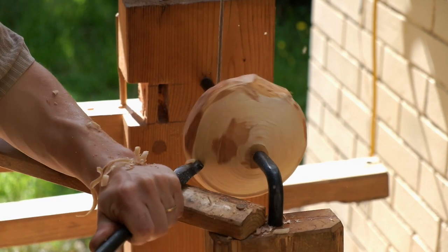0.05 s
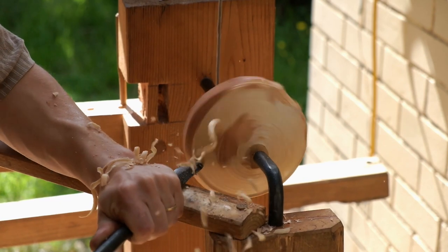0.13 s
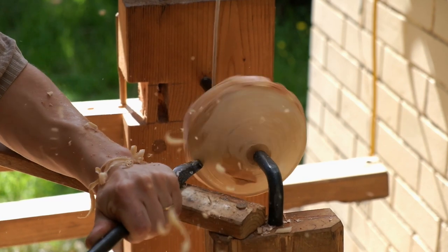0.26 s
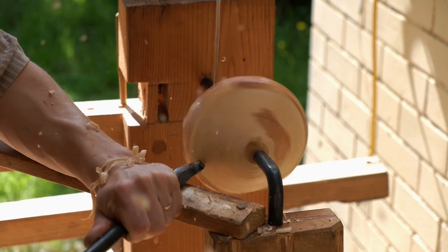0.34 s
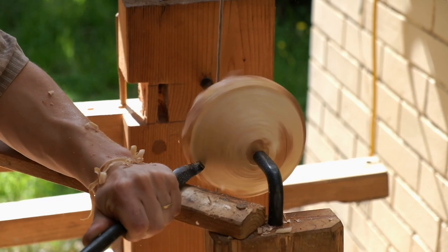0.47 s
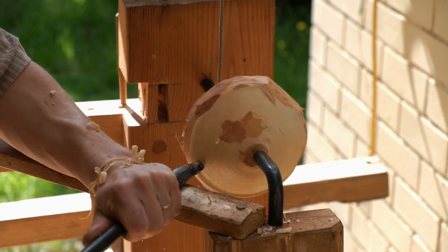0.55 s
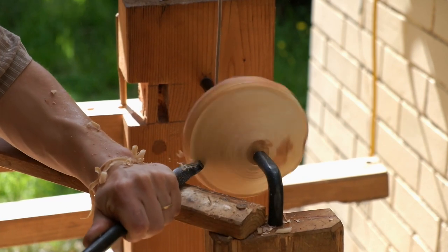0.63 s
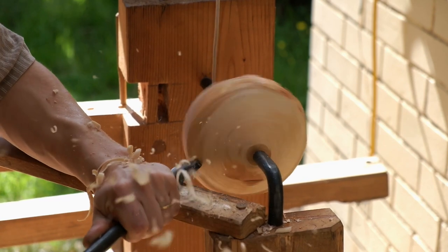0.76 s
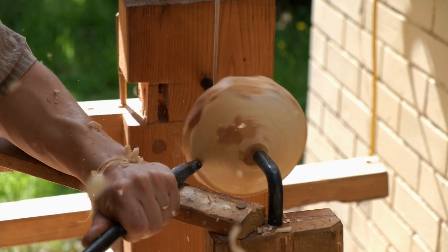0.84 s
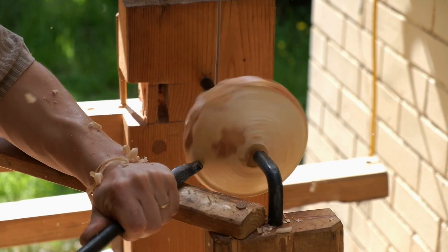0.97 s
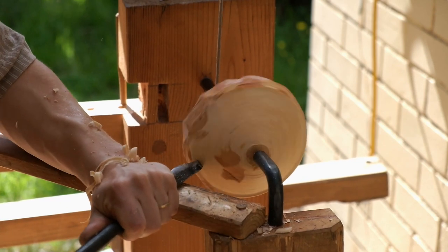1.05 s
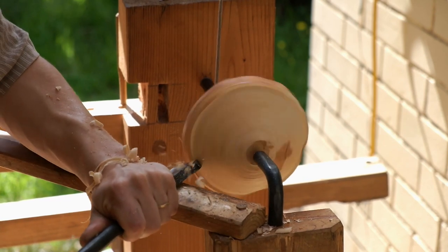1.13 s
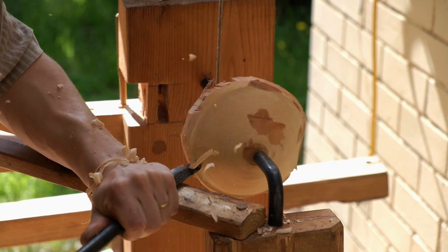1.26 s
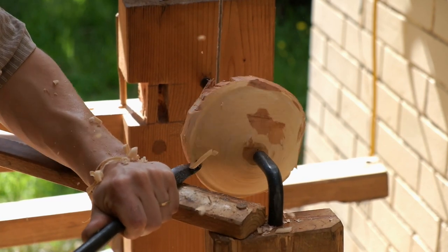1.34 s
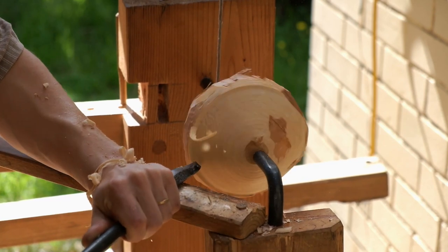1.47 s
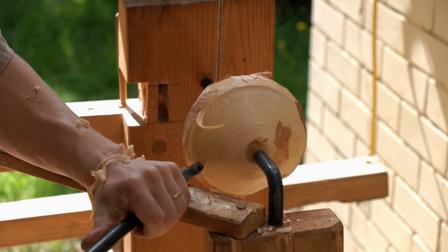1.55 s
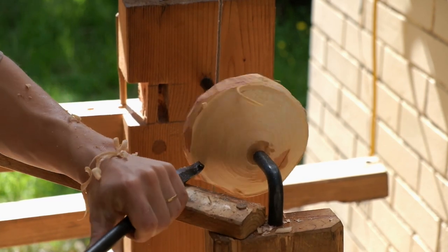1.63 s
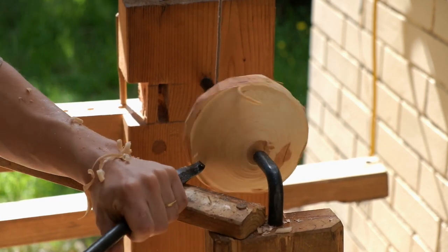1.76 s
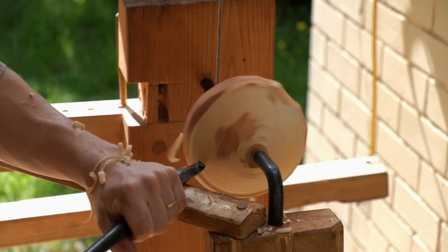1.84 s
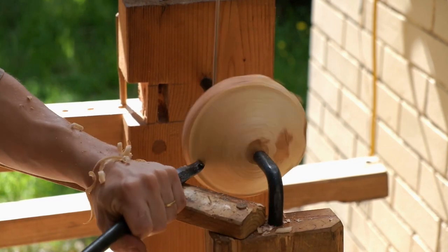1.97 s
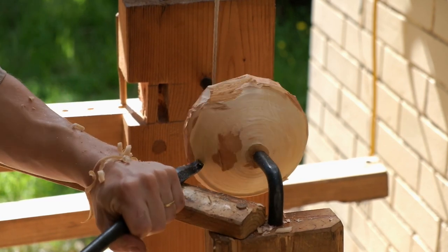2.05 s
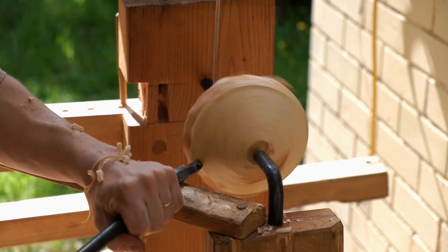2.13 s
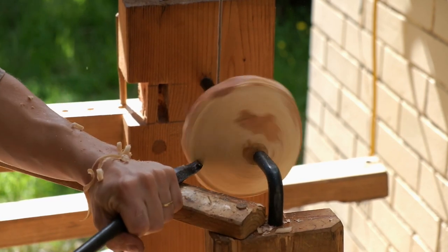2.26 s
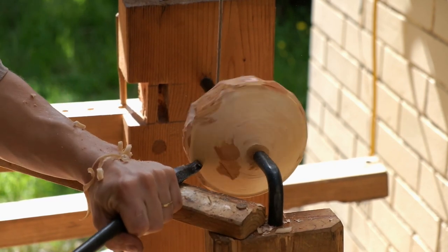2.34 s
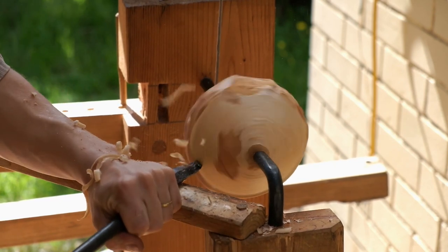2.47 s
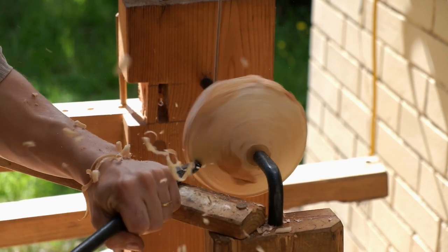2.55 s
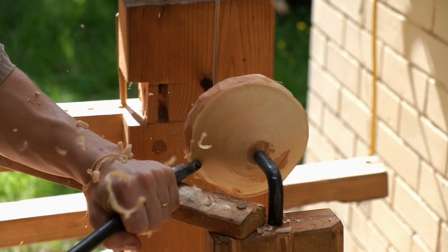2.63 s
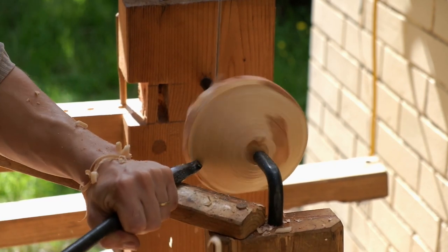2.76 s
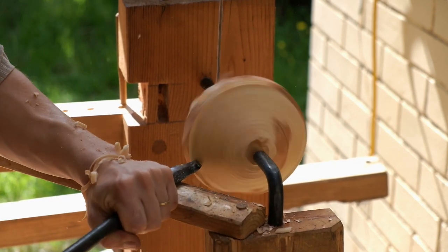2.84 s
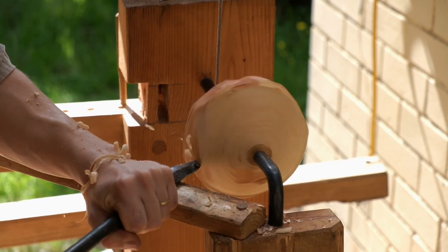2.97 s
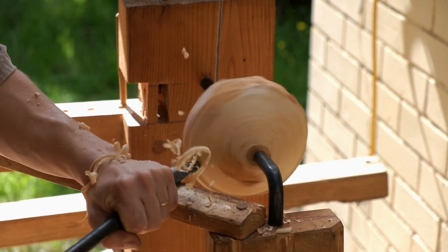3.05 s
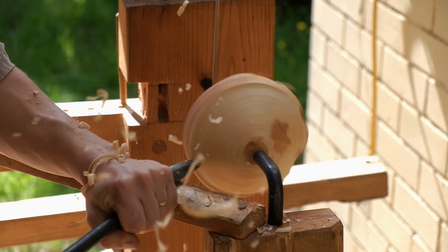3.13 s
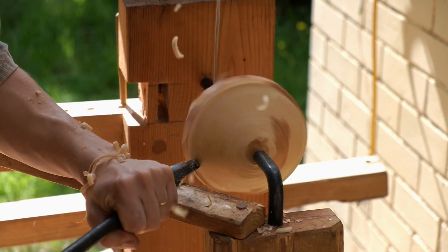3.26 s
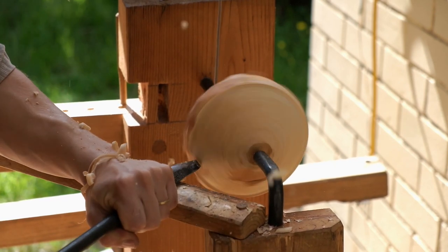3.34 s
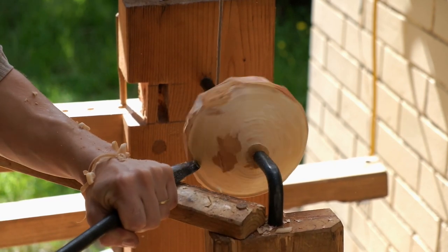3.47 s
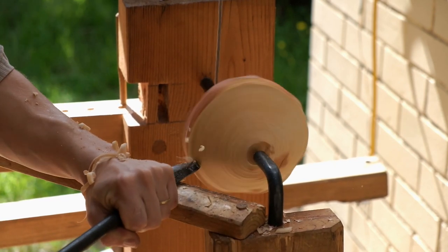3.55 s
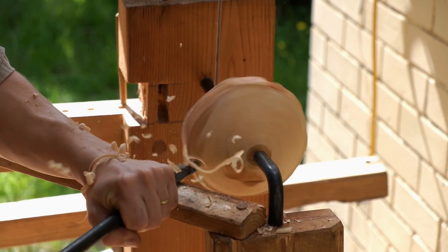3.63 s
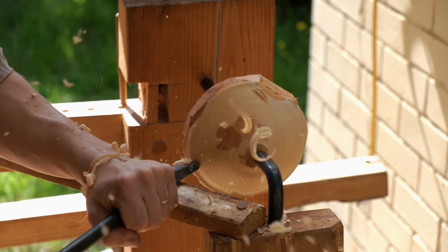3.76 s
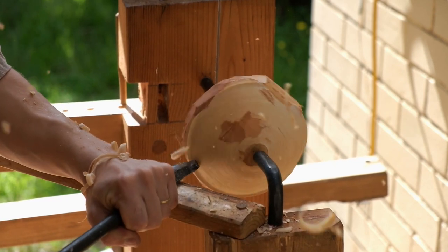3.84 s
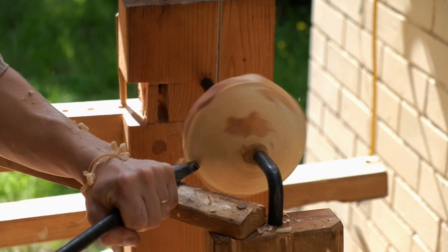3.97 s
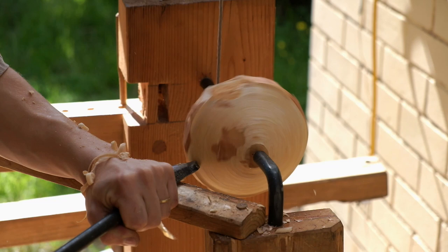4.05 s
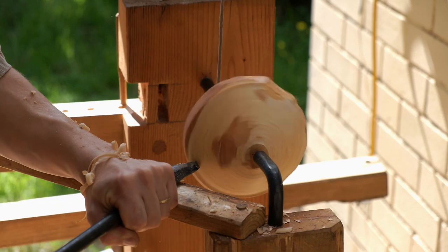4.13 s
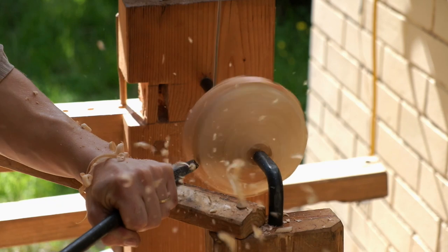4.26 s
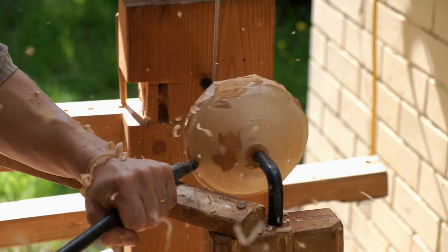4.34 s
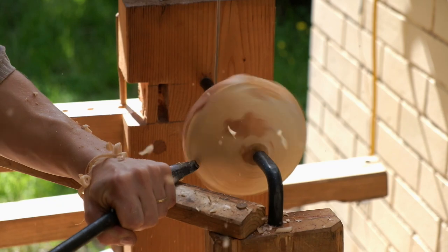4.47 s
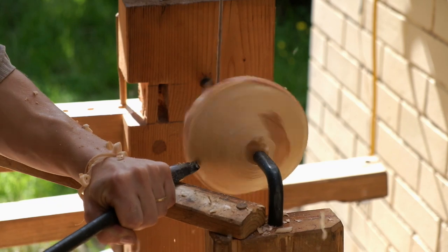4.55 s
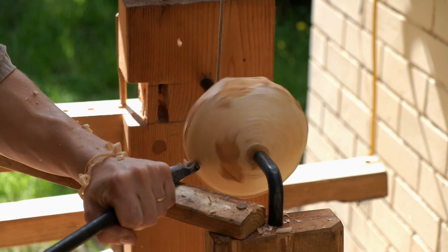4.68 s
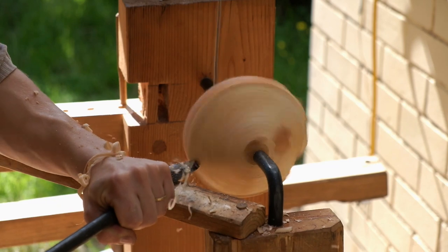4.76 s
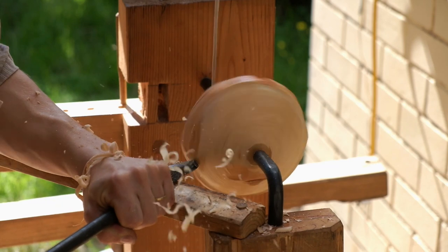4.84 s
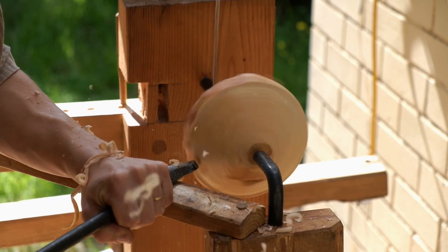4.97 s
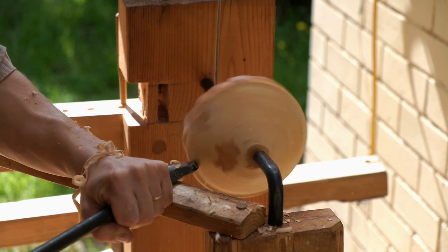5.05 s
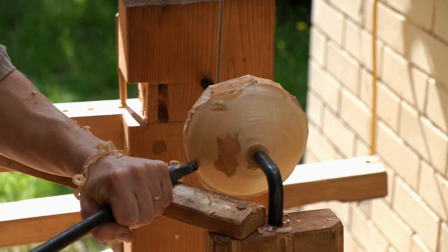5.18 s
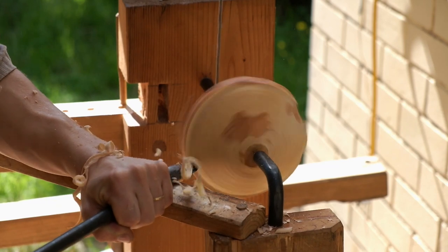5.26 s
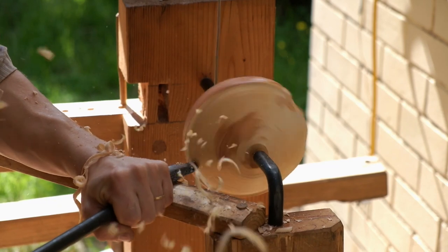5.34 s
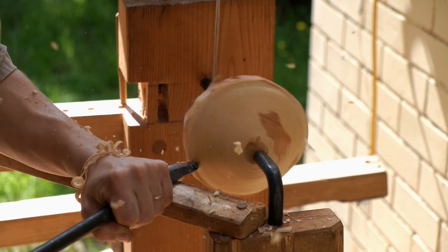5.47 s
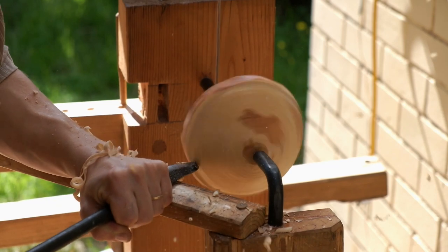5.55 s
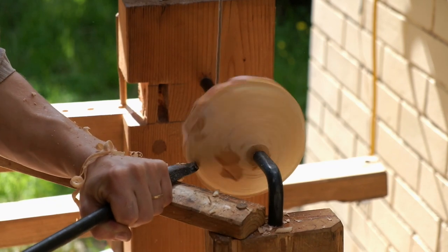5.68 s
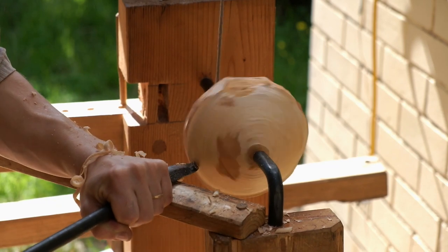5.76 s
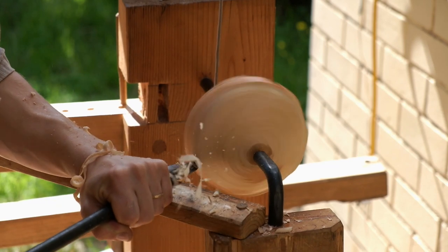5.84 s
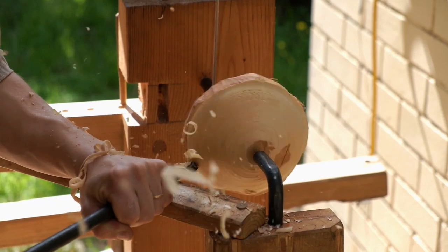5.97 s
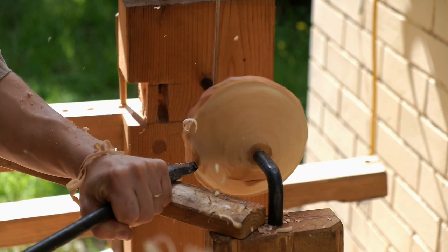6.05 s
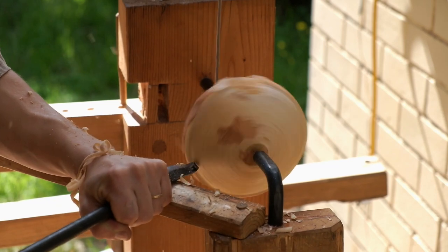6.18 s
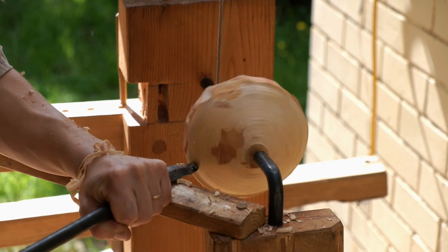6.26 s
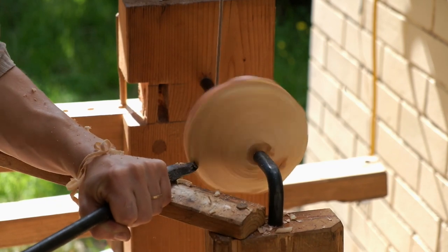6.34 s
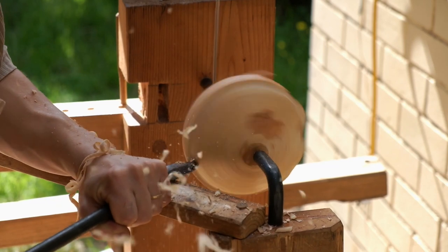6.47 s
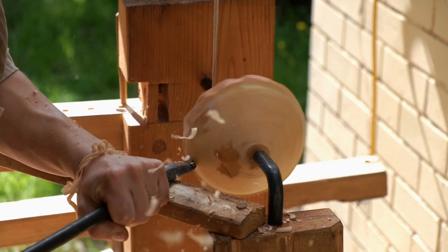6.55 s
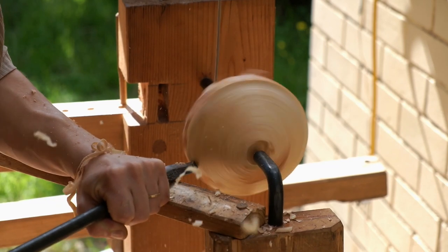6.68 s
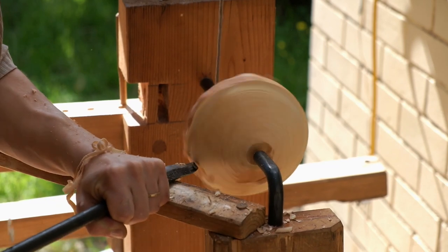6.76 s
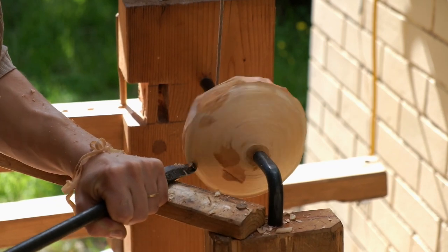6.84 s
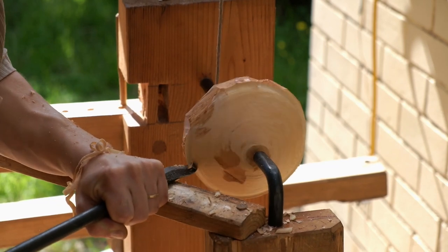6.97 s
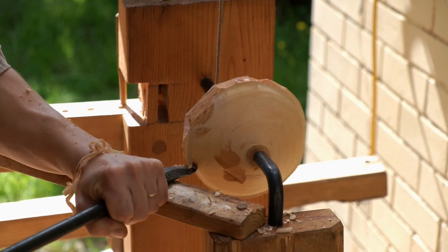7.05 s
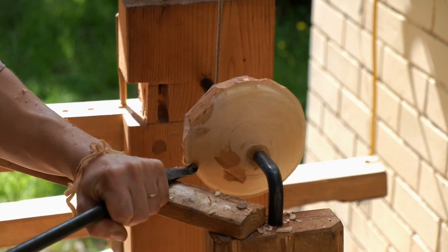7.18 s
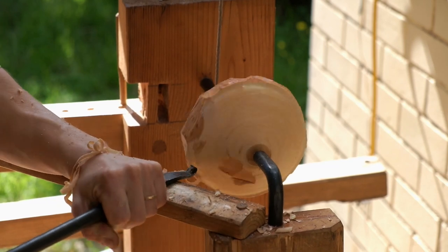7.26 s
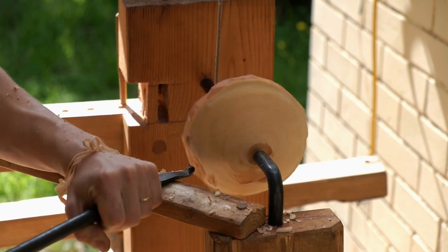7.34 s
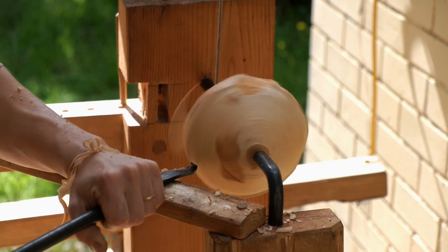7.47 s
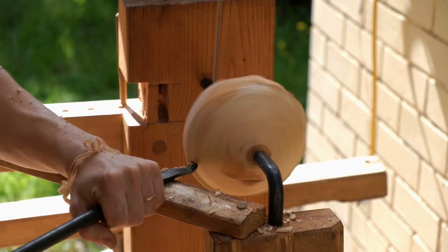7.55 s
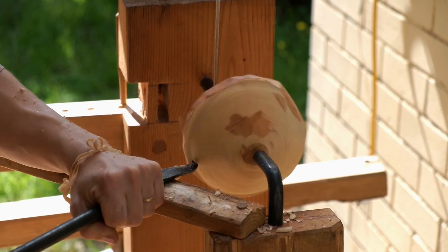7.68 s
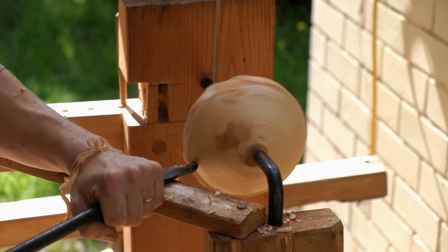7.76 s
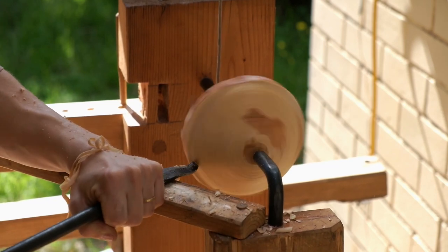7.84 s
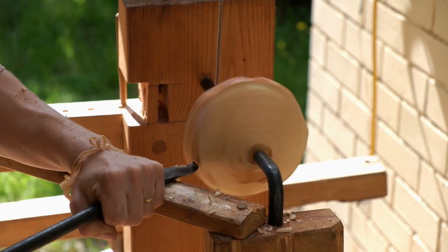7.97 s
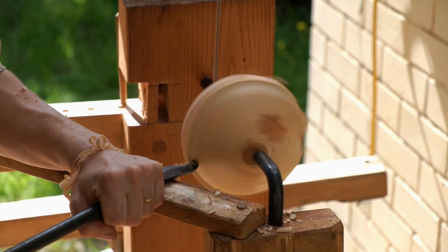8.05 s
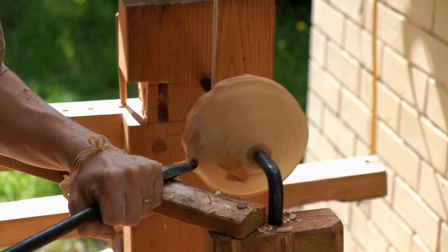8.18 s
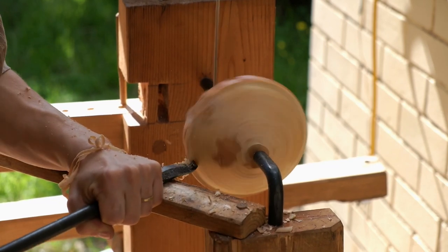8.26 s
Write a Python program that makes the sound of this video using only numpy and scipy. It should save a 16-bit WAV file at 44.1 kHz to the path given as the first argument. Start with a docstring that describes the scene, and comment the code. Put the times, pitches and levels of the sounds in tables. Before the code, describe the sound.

A close outdoor take of wood turned on a foot-driven lathe, over a faint low hum of air and distant traffic. A violent tearing bite of steel into wood lands at about 0.15 s, bright, gritty and ringing, with a hollow bowl tone. A very brief thin squeak comes near 0.56 s, rougher scrapes around 0.8 and a sharp one at 1.2 s. From 1.3 to 2.4 s there are mostly light skips, small knocks and ticks. Strong crunching cuts return near 2.5, 3.05, 3.65, 4.3, 4.8, 5.3 and 5.95 s, each with hissing shavings, then stuttering, softer contact on the backspin. A weaker cut at 6.45 s trails into dry chip ticks. From about 7 s it is nearly quiet, with only faint knocks, until light scraping and a dull wooden knock near 8.1 to 8.3 s. A nearby wall gives a short echo.

```python
"""A hard, tearing bite of steel into wood comes at once, over a low hum of distant traffic and air.
A bowl is turned on a foot-driven pole lathe in a yard, beside a brick wall that gives a quick echo.
On each down stroke, bursts of snapping fibres ring the hook tool and the bowl, and the shaving hisses.
As the pole spins the bowl back the edge only skips over it. Dull knocks of the frame, dry ticks of loose
chips and one brief squeak come between; a fast limiter holds the peaks."""
import sys
import numpy as np
from scipy import signal
from scipy.fft import rfft, irfft, next_fast_len
from scipy.io import wavfile
from scipy.ndimage import uniform_filter1d, minimum_filter1d

SR = 44100
rng = np.random.default_rng(int(sys.argv[2]) if len(sys.argv) > 2 else 0)


def bounce(signal):
    """Save signal as a 16-bit WAV file at the path given by the first command-line argument."""
    frames = np.transpose(np.atleast_2d(signal))
    limited = np.clip(frames, -1, 1)
    pcm = np.round(limited * 32767).astype(np.int16)
    wavfile.write(sys.argv[1], SR, pcm)


N = 366471
TIME = np.arange(N) / SR

# Pushes of the treadle, each with its spin back; levels are relative forces: deepest_cut_s [s], swell_s [s],
# fade_s [s], edge_db [dB], bowl_db [dB], back_edge_db [dB], back_bowl_db [dB], extra_hiss_db [dB]
STROKES = [(0.171, 0.064, 0.13, -16.5, -18.5, -56, -42, -1.5), (0.79, 0.13, 0.12, -22, -21, -49, -39.5, 5),
           (1.201, 0.066, .1, -30, -37, -72, -57, -4), (2.03, 0.059, 0.27, -38, -35.5, -44, -44, -2),
           (2.569, 0.078, 0.11, -20, -19, -51.5, -46.5, -6),
           (3.091, 0.046, 0.13, -21.5, -18, -53, -41.5, -1.5),
           (3.672, 0.13, 0.055, -20.5, -25.5, -53, -49, -2),
           (4.318, 0.12, .09, -19.5, -18, -55.5, -46.5, 3),
           (4.802, 0.049, 0.25, -27, -28, -45.5, -40.5, 2.5),
           (5.369, 0.096, 0.09, -18, -25.5, -51.5, -51, 5),
           (5.94, 0.08, 0.054, -10.5, -22.5, -53, -61, 5.5), (6.45, 0.078, 0.28, -24, -25, -68, -48.5, 2),
           (8.128, 0.026, 0.17, -28.5, -29.5, -46, -32, 6)]
RETURN_DELAY_S = 0.12  # from the deepest cut to the start of the spin back


def undb(db):
    """Decibels to gain."""
    return 10 ** (np.asarray(db) / 20)


def unit(x):
    """Scale to rms 1."""
    return x / np.sqrt(np.mean(x ** 2))


def on_log_axis(hz, points):
    """Read (Hz, value) points on a log-frequency axis."""
    f, value = np.transpose(points)
    return np.interp(np.log(np.maximum(hz, 1)), np.log(f), value)


def response(colour, modes=(), size=8192):
    """Minimum-phase impulse response of energy 1: a broad colour plus the power of ringing modes."""
    hz = np.arange(size // 2 + 1) * SR / size
    power = undb(on_log_axis(hz, colour)) ** 2
    for f, width, db in modes:
        detuning = (hz ** 2 - f ** 2) / (width * np.maximum(hz, 1))
        power = power + undb(db) ** 2 / (1 + detuning ** 2)
    # folding the cepstrum forward in time makes the response causal
    cepstrum = irfft(np.log(power) / 2)
    cepstrum[1:size // 2] *= 2
    cepstrum[size // 2 + 1:] = 0
    h = irfft(np.exp(rfft(cepstrum)))
    return h / np.sqrt(np.sum(h ** 2))


def ring(x, h):
    """Play a force through an impulse response."""
    return signal.fftconvolve(x, h)[:N]


def walk(rate):
    """Smooth chance with a spread near 1, changing rate times a second."""
    return unit(np.interp(TIME * rate, np.arange(N), rng.standard_normal(N)))


def wandering_bands(x, splits_hz, depth_db, rate):
    """Each band swells and fades by its own chance, so the colour keeps shifting; rms 1."""
    size = next_fast_len(N)
    spectrum = rfft(x, size)
    group = np.searchsorted(splits_hz, np.arange(size // 2 + 1) * SR / size)
    total = np.zeros(N)
    for k in range(len(splits_hz) + 1):
        band = irfft(spectrum * (group == k), size)[:N]
        total += band * undb(depth_db * walk(rate))
    return unit(total)


def outdoors():
    """Distant traffic and air: noise of a low colour whose bands and level gently waver."""
    # Colour of the background: pitch_hz [Hz], level_db [dB]
    background = [(25, -7.5), (65, 3.5), (110, -7), (170, -11.5), (350, -9.5), (620, -15), (900, -8),
                  (1300, -21), (2000, -25.5), (4000, -32), (7000, -46), (16000, -46)]
    air = wandering_bands(rng.standard_normal(N), [120, 300, 600, 1100], depth_db=3.0, rate=5.8)
    level_db = -42 + 0.19 * walk(8.5)
    return ring(air, response(background)) * undb(level_db)


def fibres(per_s, spread_db, hiss):
    """Tiny fractures of random size and sign over a smooth rubbing hiss, rms 1."""
    size = undb(spread_db * np.minimum(rng.exponential(size=N), 5))
    snaps = (rng.random(N) < per_s / SR) * size * rng.choice([-1, 1], N)
    return unit(unit(snaps) + hiss * rng.standard_normal(N))


def grain():
    """The shaving breaks at uneven intervals: the load jumps with each break and sags until the next."""
    typical_breaks_per_s, sag_db, spread_db = 48, 10.5, 2.5
    breaks = np.cumsum(typical_breaks_per_s * np.exp(.35 * walk(60))) / SR
    strength = rng.uniform(-1.7, 1.7, N)[breaks.astype(int)]
    return unit(undb(spread_db * strength - sag_db * (breaks % 1)))


def treadle():
    """Load on edge and bowl swells and fades with each push, then rubs lightly as the bowl spins back."""
    cut_range_db = 20  # climb during the swell, and equal fall during the fade
    return_s = 0.3  # length of the spin back
    edge, bowl = np.zeros(N), np.zeros(N)
    for s, swell_s, fade_s, edge_db, bowl_db, back_edge_db, back_bowl_db, _ in STROKES:
        cut = undb(-cut_range_db * np.maximum((s - TIME) / swell_s, (TIME - s) / fade_s))
        back = np.sin(np.pi * np.clip((TIME - s - RETURN_DELAY_S) / return_s, 0, 1))
        edge += undb(edge_db) * cut + undb(back_edge_db) * back
        bowl += undb(bowl_db) * cut + undb(back_bowl_db) * back
    return np.array([edge, bowl]) * grain()


def skips(count=6):
    """Light, uneven touches of the edge during each spin back, as rows like the catches."""
    gap_s, jitter_s, length_s = 0.072, .015, 0.014
    edge_lift_db, bowl_lift_db, spread_db = 7.5, 1, 8  # lifts are over the rubbing of edge and bowl
    rows = []
    for s, *_, edge_db, bowl_db, _ in STROKES:
        for k, (late, strength) in enumerate(rng.uniform(-1.2, 1, (count, 2))):
            when = s + RETURN_DELAY_S + (k + 1) * gap_s + jitter_s * late
            scatter_db = spread_db * strength
            rows.append((when, edge_db + edge_lift_db + scatter_db, bowl_db + bowl_lift_db + scatter_db, length_s))
    return rows


def catch_forces(rows, edge_rise_s, bowl_rise_s, size=8000):
    """Each catch loads edge and bowl from the same moment, then lets go along a bell-shaped fall."""
    power, t = np.zeros((2, N + size)), np.arange(size) / SR
    attack = 1 - np.exp(-t / np.array([[edge_rise_s], [bowl_rise_s]]))
    for s, edge_db, bowl_db, length_s in rows:
        start = min(int(s * SR), N)
        force = undb([[edge_db], [bowl_db]]) * attack * np.exp(-(t / length_s) ** 2)
        power[:, start:start + size] += force ** 2
    return np.sqrt(power[:, :N])


def hook_tool(edge, slip):
    """Snapping fibres ring the steel hook on its rest, in proportion to the force on the edge."""
    # Broad colour of a snapping fibre: pitch_hz [Hz], level_db [dB]
    snap = [(300, -40), (1200, -20), (2100, -15), (2800, -12), (4000, -27.5), (6500, -38.5), (8000, -35),
            (11000, -24.5), (16000, -52.5)]
    # Ringing of the tool on its rest: pitch_hz [Hz], width_hz [Hz], level_db [dB]
    tool_modes = [(2210, 92, -2.5), (2576, 105, 0.5), (3180, 86, -11.5), (3335, 150, 1.5), (3420, 210, -2),
                  (3840, 89, 0.5), (4714, 164, -2), (5367, 150, -0.5), (5970, 140, -12), (6990, 79, -5.5),
                  (7260, 170, -11), (9300, 460, -18.5)]
    # the contact point keeps moving, so it favours now one group of modes, now another
    splits_hz = [1690, 2355, 3020, 3700, 4560, 4860, 6320]
    tearing = wandering_bands(fibres(per_s=2800, spread_db=1.0, hiss=0.66), splits_hz, depth_db=3.0, rate=60)
    unevenness = unit(undb(3.9 * np.clip(slip, -2, 1.2)))
    return ring(edge * tearing * unevenness, response(snap, tool_modes))


def wooden_bowl(drag, slip):
    """The drag shakes the bowl: a light touch rubs its low modes, a hard bite reaches the upper ones too."""
    # Broad colour of the drag: pitch_hz [Hz], level_db [dB]
    thud = [(30, -19.5), (70, -16.5), (160, -13), (300, -12), (700, -15), (1050, -26.5), (1400, -21),
            (2200, -15), (5000, -36), (16000, -78.5)]
    # Ringing of bowl and frame: pitch_hz [Hz], width_hz [Hz], level_db [dB]
    bowl_modes = [(400, 16, -2.5), (488.7, 24, 2), (551.2, 35, -1), (677, 70, -23.5), (862.5, 76, 1.5),
                  (915, 17, -3.5), (1190, 108, -6), (1298, 32, -5), (1598, 90, -5.5)]
    splits_hz = [248, 411.0, 700, 1053]
    shaking = wandering_bands(fibres(per_s=1500, spread_db=1.0, hiss=0.52), splits_hz, depth_db=3.5, rate=40)
    soft = signal.lfilter(*signal.butter(2, 650, fs=SR), shaking)
    hard = fibres(per_s=2000, spread_db=2.5, hiss=0.41) * unit(undb(1.5 * slip))
    hardness = np.clip(drag / undb(-10.5), 0, 1.3) ** 0.47
    touch = 1.33 * soft * np.maximum(1 - hardness, 0) + hardness * hard
    return ring(drag * touch, response(thud, bowl_modes))


def shaving_force(edge_load, edge_catch):
    """The hiss follows the load on the edge, some shavings run drier, and loose chips tick in between."""
    # Loose chips flicking off the rim with a thin, dry tick: start_s [s], level_db [dB, relative force]
    loose_chips = [(1.057, -40), (1.292, -47), (1.395, -55), (3.497, -35.5), (3.995, -34), (4.03, -52.5),
                   (4.1, -39), (4.66, -43), (5.16, -35), (5.745, -41.5), (6.554, -26), (6.73, -38),
                   (6.808, -29.5)]
    chip_s = 0.0099  # rise and fall time of a tick, whose rise is cut off before its start
    strokes = np.array(STROKES)
    dryness = undb(np.interp(TIME, strokes[:, 0], strokes[:, -1]))
    steady_hiss = undb(-14) * edge_load
    catch_hiss = undb(-16) * edge_catch ** 0.91
    running = dryness * np.hypot(steady_hiss, catch_hiss)
    chips = sum(undb(db) * (TIME > s) * np.exp(-np.abs(TIME - s) / chip_s) for s, db in loose_chips)
    return np.hypot(running, chips)


def sliding_shaving(slide, slip):
    """The shaving slides off the edge with a bright hiss of dense, very unequal fractures."""
    # Colour of the sliding shaving: pitch_hz [Hz], level_db [dB]
    shaving_colour = [(1500, -34), (4500, -8.5), (7000, 7.5), (7900, -6.5), (9000, -0.5), (11000, -10.5),
                      (13000, 0), (16000, -20)]
    modes = [(8860, 450, 6), (11040, 270, 5.0), (12700, 530, -9.0)]  # Hz, width Hz, dB
    rustle = fibres(per_s=7700, spread_db=6.5, hiss=0.89)
    unevenness = unit(undb(4.5 * np.clip(slip, -2, 1.2)))
    return ring(slide * rustle * unevenness, response(shaving_colour, modes))


def cutting():
    """Strokes, catches and skips load edge and bowl; one uneven slip roughens tool, bowl and shaving."""
    # The edge catches a high spot; levels are relative forces:
    # start_s [s], edge_db [dB], bowl_db [dB], length_s [s]
    catches = [(0.02, -36, -38, 0.016), (0.095, -27.5, -34, .03), (0.115, -11, -43, 0.015),
               (0.131, -14.5, -35, 0.0089), (0.15, 0, -15, 0.023), (0.178, -3, -7.5, 0.025),
               (0.25, -18.5, -15, 0.021), (0.4, -32, -26, 0.014), (0.463, -25.5, -20.5, 0.0049),
               (0.556, -31, -52, 0.012), (0.638, -32, -54, 0.069), (0.739, -18.5, -20.5, 0.038),
               (0.82, -16.5, -45, 0.0075), (0.874, -26, -23.5, 0.033), (0.951, -23, -19, 0.006),
               (1.014, -28, -18.5, 0.0085), (1.144, -22.5, -44, 0.031), (1.189, -6, -19, 0.028),
               (1.508, -48, -26, 0.0093), (1.876, -27.5, -32, 0.0063), (1.982, -29, -28, 0.0098),
               (2.168, -28.5, -19.5, 0.0083), (2.252, -23.5, -21.5, 0.0058), (2.324, -26.5, -27, 0.0059),
               (2.463, -34.5, -19, 0.01), (2.494, -7.5, -9.5, .028), (2.536, -12, -19, 0.014),
               (2.586, -8.5, -16, 0.036), (2.938, -32.5, -28.5, 0.04), (2.985, -23, -19.5, 0.038),
               (3.042, -0.5, -8.5, 0.047), (3.155, -15, -15.5, 0.012), (3.311, -34, -25, .011),
               (3.347, -27.5, -25.5, 0.011), (3.412, -31.5, -29.5, 0.011), (3.584, -18.5, -36, 0.0082),
               (3.616, -16, -23, 0.024), (3.645, -1.5, -9.5, 0.025), (3.684, -2, -22, 0.011),
               (3.713, -7.5, -19, 0.036), (3.753, -22.5, -11.5, 0.016), (4.179, -31.5, -46, 0.035),
               (4.25, -5, -17, 0.036), (4.293, -3, -8, 0.014), (4.458, -31, -24, .009),
               (4.5, -34, -22.5, 0.014), (4.568, -34, -25.5, 0.013), (4.717, -30.5, -43, 0.11),
               (4.75, -20, -32, 0.0078), (4.783, -17.5, -20.5, 0.0082), (4.829, -11, -17, 0.006),
               (4.85, -23, -27.5, 0.049), (4.9, -18, -27.5, 0.008), (4.993, -24.5, -24, 0.024),
               (5.104, -32.5, -22.5, 0.0077), (5.285, -19.5, -23.5, 0.039), (5.316, -1, -8, 0.02),
               (5.431, -29, -16, 0.0046), (5.572, -31, -23.5, 0.011), (5.647, -29.5, -23, 0.0054),
               (5.85, -31, -20, 0.0082), (5.938, -2.5, -9, 0.016), (6.002, -2, -12.5, 0.01),
               (6.213, -33, -31, 0.0087), (6.291, -37, -29.5, 0.018), (6.409, -16, -24, .027),
               (6.652, -22.5, -24.5, 0.017), (6.754, -32, -29.5, 0.01), (6.815, -36.5, -39, 0.09),
               (6.897, -16, -34, 0.015), (7.515, -49, -46, 0.051), (7.655, -46.5, -47, 0.014),
               (7.76, -66, -29, 0.015), (8.074, -30.5, -28, 0.027), (8.232, -28, -25, 0.02),
               (8.279, -20.5, -34, 0.013)]
    slip = walk(210)
    edge_load, bowl_load = treadle()
    edge_catch, bowl_catch = catch_forces(catches + skips(), edge_rise_s=0.00071, bowl_rise_s=0.0023)
    edge = np.hypot(edge_load, edge_catch)
    edge = edge * (1 + 0.25 * edge)  # a deep cut pulls the hook in further
    drag = np.hypot(bowl_load, bowl_catch)
    tool = hook_tool(edge, slip)
    bowl = wooden_bowl(drag, slip)
    shaving = sliding_shaving(shaving_force(edge_load, edge_catch), slip)
    return undb(0.7) * tool + undb(3.5) * bowl + undb(0.5) * shaving


def frame(decay_s=0.016, q=9.5, rattle_db=-18, size=4000):
    """Loose wooden joints knock: decaying noise through a resonance, with a little rattle."""
    # Dull knocks of treadle and frame: start_s [s], level_db [dB, peak], pitch_hz [Hz]
    joint_knocks = [(0.274, -10, 500), (0.69, -16, 517), (0.72, -16, 400), (0.93, -16, 400),
                    (0.952, -15, 470), (1.231, -17.5, 481), (1.24, -23.5, 204), (1.39, -29, 367),
                    (1.498, -23.5, 328), (1.514, -23, 560), (1.516, -33, 955), (1.652, -29, 274),
                    (1.695, -33, 780), (1.725, -30.5, 700), (2.035, -26, 470), (2.751, -22, 550),
                    (3.327, -25, 500), (4.55, -32, 89), (4.86, -22, 162), (6.134, -24.5, 283),
                    (6.925, -27, 320), (7.657, -33, 310), (7.76, -27.5, 685), (8.16, -21, 280),
                    (8.2, -25, 75), (8.242, -14, 476)]
    knocks, t = np.zeros(N + size), np.arange(size) / SR
    for s, db, hz in joint_knocks:
        blow = rng.standard_normal(size) * np.exp(-t / decay_s)
        knock = signal.lfilter(*signal.iirpeak(hz, q, fs=SR), blow)
        rattle = signal.lfilter(*signal.butter(2, 2 * hz, fs=SR), blow)  # low-passed an octave up
        sound = knock + undb(rattle_db) * rattle
        start = int(s * SR)
        knocks[start:start + size] += undb(db) * sound / np.abs(sound).max()
    return knocks[:N]


def squeak(db=-27, hz=2850, decay_s=0.011):
    """The hook skids once and gives a brief thin note: a decaying sine with a soft onset."""
    t = np.maximum(TIME - .561, 0)
    onset = 1 - np.exp(-t / .003)
    return undb(db) * onset * np.exp(-t / decay_s) * np.sin(2 * np.pi * hz * t)


def yard(x, wall_s=.0095, wall_db=-16, tail_db=-16, build_s=.011, size=36000):
    """A quick echo from the wall, then a faint scattered tail from the buildings around."""
    # How long the yard rings, by pitch: pitch_hz [Hz], t60_s [s]
    yard_t60 = [(150, 0.34), (800, 0.46), (3500, 0.37), (7000, 0.42), (14000, 0.27)]
    t, hz = np.arange(size) / SR, np.arange(size // 2 + 1) * SR / size
    noise, tail = rfft(rng.standard_normal(size)), 0
    for low in 44 * 2 ** np.arange(9):  # octave bands, each with its own decay
        band = irfft(noise * ((hz >= low) & (hz < 2 * low)))
        tail = tail + band * np.exp(-np.log(1000) * t / on_log_axis(low * np.sqrt(2), yard_t60))
    tail = unit(tail * (1 - np.exp(-t / build_s)))
    colour = undb(on_log_axis(hz, [(200, -3.0), (900, 3.5), (3500, -5.5), (7000, -10), (14000, -20.0)]))
    h = undb(tail_db) * irfft(rfft(tail) * colour) / np.sqrt(size)
    h[int(wall_s * SR)] += undb(wall_db)
    return x + ring(x, h)


def scene():
    """The lathe in its yard, one channel; the background gets no echo."""
    lathe = cutting() + squeak() + frame()
    return (yard(lathe) + outdoors())[None]


def record(dry, size=130):
    """A fast limiter flattens the loudest bites, then a steep low-pass cuts the top."""
    gain = np.minimum(1, .72 / (np.abs(dry) + 1e-9))
    gain = uniform_filter1d(minimum_filter1d(gain, size), size)
    low_pass = signal.ellip(10, .2, 80, 16200, fs=SR, output="sos")  # 16200 Hz
    return signal.sosfilt(low_pass, dry * gain)


dry = scene()
out = record(dry)
bounce(out)
```